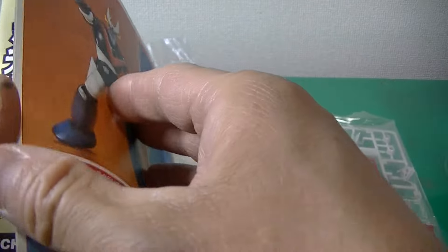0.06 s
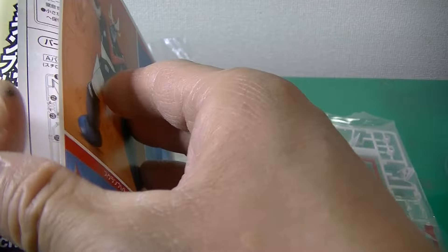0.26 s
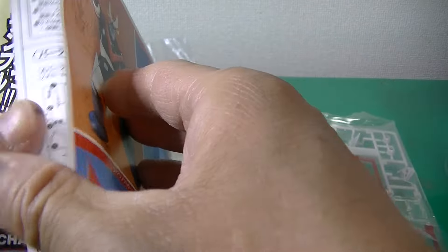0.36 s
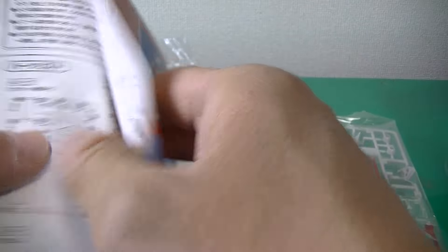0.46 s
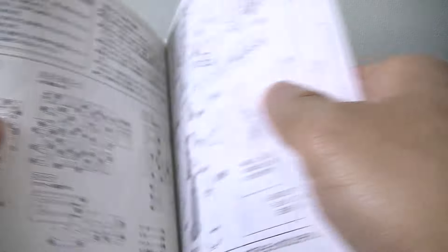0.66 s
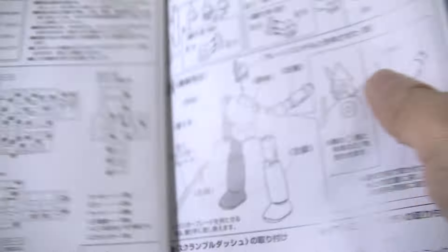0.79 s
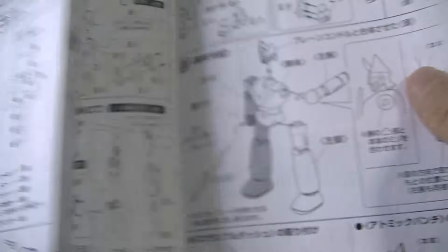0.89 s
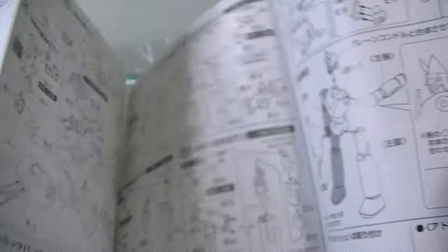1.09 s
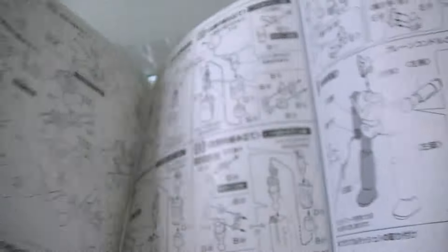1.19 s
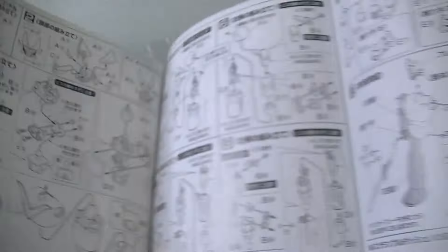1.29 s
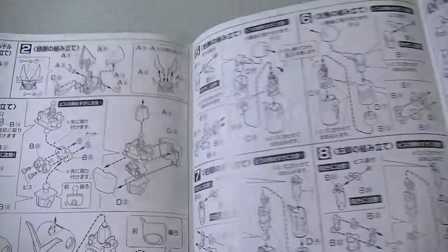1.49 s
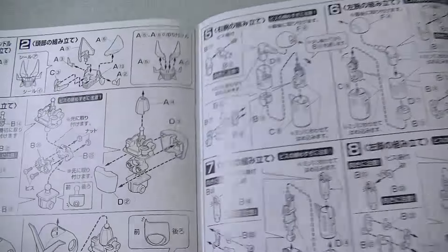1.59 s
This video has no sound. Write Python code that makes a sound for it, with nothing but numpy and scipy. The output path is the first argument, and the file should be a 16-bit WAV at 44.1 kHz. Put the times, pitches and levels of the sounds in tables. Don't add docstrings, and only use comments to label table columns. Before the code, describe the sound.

Close, dry page turning: light edge ticks build to sharp snaps, then crinkling paper settles quietly

```python
import sys
import numpy as np
from scipy import signal
from scipy.io import wavfile

SR = 44100
rng = np.random.default_rng(int(sys.argv[2]) if len(sys.argv) > 2 else 0)


def makeup_ratio(level_db):
    decades = np.asarray(level_db, float) / 20
    return 10 ** decades


def generate_wav(signal):
    frames = np.transpose(np.atleast_2d(signal))
    scaled = np.clip(frames, -1, 1) * 32767
    pcm = np.round(scaled).astype(np.int16)
    wavfile.write(sys.argv[1], SR, pcm)


N = 72765


def rms_one(x):
    return x / np.sqrt(np.mean(x ** 2) + 1e-20)


def in_time(rows):
    time_s, level_db = np.transpose(rows)
    return np.interp(np.arange(N) / SR, time_s, level_db)


def at_hz(points, hz):
    points = np.array(points)
    return np.interp(np.log(hz), np.log(np.maximum(points[:, 0], 1)), points[:, 1])


# pitch_hz, side_over_middle_db
STEREO_WIDTH = [(40, -8), (300, -17), (2000, -18.5), (7000, -6.5), (14000, -3)]


def spread(mid, side, hz):
    return mid + makeup_ratio(at_hz(STEREO_WIDTH, hz)) * side * np.array([[1], [-1]])


def drift(rate_hz):
    r = np.exp(-80 * np.pi * rate_hz / SR)
    white = rng.standard_normal(N // 40 + 2002)
    slow = signal.lfilter([1], [1, -2 * r, r * r], white)[2000:]
    return np.interp(np.arange(N) / 40, np.arange(len(slow)), rms_one(slow))


def banded_noise(spectrum, patchy_db, rate_hz):
    out = 0
    together = drift(rate_hz)
    edges_hz = 22 * 2 ** np.arange(0, 9.6, .5)
    white = rng.standard_normal((2, 2, N))
    for k, (low, high) in enumerate(zip(edges_hz, edges_hz[1:])):
        band = signal.butter(2, [low, high], "band", fs=SR, output="sos")
        mid, side = signal.sosfilt(band, white[k % 2])
        hz = np.sqrt(low * high)
        flicker_db = patchy_db * (together + 2.1 * drift(rate_hz))
        out = out + makeup_ratio(at_hz(spectrum, hz) + flicker_db) * spread(mid, side, hz)
    return rms_one(out)


def ring(clicks, hz, cycles):
    r = makeup_ratio(-60 * hz / (cycles * SR))
    w = 2 * np.pi * hz / SR
    stage = [(1 - r * r) / 2, 0, (r * r - 1) / 2, 1, -2 * r * np.cos(w), r * r]
    return signal.sosfilt([stage] * 3, clicks + 1e-18) / np.sqrt(1 - r * r)


def clump_shapes(start_s, length_s, sag):
    attack_s, attack_share = 0.00078, 0.13
    release_s, tail_db, tail_s, treble_s = 0.0037, -27.5, 0.11, 0.0044
    t = np.arange(N) / SR - start_s
    length_s = np.maximum(length_s, .002)
    after = np.maximum(t - length_s, 0)
    swell = np.clip(t / (attack_s + attack_share * length_s), 0, 1)
    hold = np.exp(-sag * np.clip(t / length_s, 0, 1))
    shape = swell * hold * (np.exp(-after / release_s) + makeup_ratio(tail_db) * np.exp(-after / tail_s))
    if sag > 0:
        return shape, shape * (0.66 + np.exp(-np.maximum(t, 0) / treble_s))
    return shape, shape


def creases(rows, spectrum, sag):
    creases_per_s, crease_spread_db, fuzz = 2500, 3.5, 0.6
    rows = np.array(rows)
    level_db, dullness_db, brightness_db = rows[:, 1], rows[:, 3], rows[:, 4]
    shape, treble_shape = clump_shapes(rows[:, :1], rows[:, 2:3], sag)
    born = rng.random(N) < creases_per_s / SR
    strength_db = crease_spread_db * np.minimum(rng.exponential(1, N), 4)
    clicks = rms_one(born * makeup_ratio(strength_db))
    pitches = np.geomspace(170, 13500, 30)
    weights_db = at_hz(spectrum, pitches) + 10 * np.log10(pitches)
    out = 0
    for hz, weight_db in zip(pitches, weights_db - max(weights_db)):
        dull = np.clip(np.log2(1300 / hz), 0, 1)
        bright = np.clip(np.log2(hz / 2800), 0, 1.5)
        db = level_db + dull * (dullness_db + 17) + bright * (brightness_db + 7)
        db = db + 2.96 * rng.standard_normal(len(rows))
        loudness = makeup_ratio(db) @ (treble_shape if bright > .5 else shape)
        cycles = 9.5 * (hz / 2000) ** 0.27
        hits = (clicks + fuzz) * loudness * rng.standard_normal((2, N))
        delay = int(2 * cycles / np.log(1000) / hz * SR)
        mid, side = np.roll(ring(hits, hz, cycles), -delay, axis=1)
        out = out + makeup_ratio(weight_db) * spread(mid, side, hz)
    return makeup_ratio(-19) * out


# start_s, level_db, length_s, dullness_db, brightness_db
THUMB_SLIPS = [(.006, -22.5, 0.0076, -37, 0.5), (.0255, -18.5, 0.0033, -27, -4),
               (.065, -17, 0.0078, -5.5, -17), (.201, -18.5, 0.015, -51, -9), (.213, -19, 0.0093, -18, 2.5),
               (.286, -31, 0.0075, -15, 8.5), (.314, -22, .007, -43, 1.5), (.325, -31, 0.0059, -38, -4),
               (.352, -27, 0.0048, -40, -3), (.365, -21, 0.014, -31, -2.5), (.407, -22.5, 0.025, -53, 0),
               (.426, -22.5, 0.0093, -4.5, 2), (.438, -16.5, 0.01, -5.5, 1), (.444, -9, 0.017, -45, 0),
               (.467, -2.5, 0.0027, -12, -2), (.473, -15.5, 0.01, -46, 4.5), (.486, -20, 0.0089, -40, 8.5),
               (.496, -14.5, 0.011, -9, 11.5), (.507, -11, 0.0099, -6, -6), (.519, -8.5, 0.0091, -12, -11)]
# pitch_hz, level_db (per Hz)
EDGE_TONE = [(90, -50), (160, -20.5), (1100, -9), (1800, 0.5), (3800, -13.5), (7800, -29), (16000, -50.5)]


def edge_riffle():
    return creases(THUMB_SLIPS, EDGE_TONE, sag=-0.51)


# start_s, level_db, length_s, dullness_db, brightness_db
SHEET_BUCKLES = [(.533, -12, 0.016, -21, -34), (.551, -8.5, 0.014, -15.5, -42),
                 (.638, -18.5, 0.033, -20.5, -31), (.734, -23.5, 0.008, -8, -25),
                 (.782, -24.5, 0.02, 2, 13.5), (.815, -5.5, 0.011, -13, -11),
                 (.852, -0.5, 0.013, -22.5, -7.5), (.863, -5.5, 0.015, -16.5, 0.5),
                 (.878, -10, 0.014, -13.5, 2.5), (.9335, 3.5, 0.0066, -20.5, -3),
                 (.941, -5, 0.013, -26, -12.5), (.958, -7, 0.012, -10.5, -13),
                 (.979, -10, 0.017, -16.5, -5), (1.005, -6.5, 0.0064, -23, -13.5),
                 (1.014, -9, 0.016, -16.5, -15), (1.052, -12, 0.016, -13.5, -13),
                 (1.074, -13.5, 0.0045, -11, 6), (1.08, -9, 0.029, -19.5, -56),
                 (1.124, -19.5, 0.016, -8, -45), (1.132, -18, 0.025, -20.5, -50)]
# start_s, level_db, length_s, dullness_db, brightness_db
PAGE_SETTLES = [
    (1.213, -29.5, 0.028, -4, -32),
    (1.246, -18, 0.032, -17, -25),
    (1.351, -14, 0.02, -19.5, 5.5),
    (1.374, -24, 0.046, -16, -9),
    (1.406, -23.5, 0.025, -36, 5.5),
    (1.432, -18.5, 0.025, -64, 1),
    (1.453, -24.5, 0.055, -12, 6),
    (1.505, -18.5, 0.014, -40, 2),
    (1.615, -27, 0.01, -22, 2),
    (1.624, -26.5, 0.012, -3.5, 1),
]
# pitch_hz, level_db (per Hz)
SHEET_TONE = [(90, -35), (160, -9), (1100, 1), (2100, -1), (3600, -8.5), (6000, -23), (16000, -53)]


def sheet_buckling():
    return creases(list(SHEET_BUCKLES) + list(PAGE_SETTLES), SHEET_TONE, sag=0.65)


# peak_s, peak_db, pitch_hz
EDGE_SNAPS = [(0.0067, -25.1, 2050), (0.0096, -24.1, 1830), (0.0272, -23.1, 1830), (0.0298, -21.6, 2050),
              (0.0639, -28.8, 1830), (0.0682, -21.0, 1620), (0.1611, -29.2, 2050), (0.2133, -23.7, 2050),
              (0.2137, -31.8, 7510), (0.2195, -27.3, 8440), (0.221, -17.6, 1830), (0.2932, -36.8, 2930),
              (0.3207, -17.4, 1830), (0.3245, -26.4, 1830), (0.3282, -20.1, 2310), (0.359, -28.4, 1830),
              (0.3692, -24.4, 1620), (0.3742, -25.9, 1830), (0.3766, -25.1, 2050), (0.3793, -22.8, 1830),
              (0.4111, -26.9, 1620), (0.4292, -17.0, 1830), (0.4388, -17.0, 1830), (0.4459, -10.7, 1830),
              (0.4493, -11.9, 1830), (0.4532, -13.6, 1620), (0.4586, -7.6, 1620), (0.4709, -2.8, 2050),
              (0.4793, -7.3, 2050), (0.4833, -15.0, 3290), (0.4874, -18.7, 3700), (0.498, -16.1, 6670),
              (0.5025, -9.3, 6670), (0.5081, -10.2, 6670), (0.5088, -14.0, 2310), (0.511, -13.8, 5270),
              (0.5156, -16.0, 2310), (0.523, -9.9, 2050), (0.5351, -16.5, 2310), (0.5522, -20.6, 2050),
              (0.5551, -19.8, 1830), (0.5852, -24.8, 2600), (0.6371, -27.0, 2930), (0.6395, -26.2, 1440),
              (0.6496, -25.2, 2930)]
# peak_s, peak_db, pitch_hz
SHEET_SNAPS = [(0.7351, -20.6, 1440), (0.7904, -22.8, 1280), (0.8165, -12.9, 1440), (0.8205, -12.0, 1010),
               (0.8232, -10.9, 2050), (0.8259, -13.9, 1620), (0.8541, -8.2, 2930), (0.8657, -8.4, 3290),
               (0.8688, -15.6, 2310), (0.8878, -16.0, 4170), (0.8902, -19.9, 4170), (0.8929, -19.9, 1620),
               (0.9346, -4.4, 2310), (0.9408, -8.7, 2310), (0.9471, -10.2, 2050), (0.962, -11.3, 1830),
               (0.9834, -14.7, 2050), (0.9859, -15.8, 1830), (1.0066, -17.3, 1010), (1.0148, -15.6, 1830),
               (1.0175, -17.0, 1140), (1.0206, -15.6, 2310), (1.0237, -15.5, 1830), (1.0532, -16.9, 1280),
               (1.0552, -18.6, 9500), (1.0614, -15.0, 1440), (1.0908, -13.7, 1620), (1.1478, -21.1, 1280),
               (1.2163, -28.2, 1280), (1.2544, -21.0, 1440), (1.2678, -23.9, 1620), (1.3518, -24.1, 1010),
               (1.3527, -25.5, 6670), (1.3549, -25.2, 1280), (1.362, -25.2, 2600), (1.3712, -23.7, 1830),
               (1.4572, -26.9, 2600), (1.5042, -16.7, 2050), (1.5093, -25.7, 1830), (1.5137, -29.5, 1620),
               (1.6192, -33.1, 3700), (1.6267, -29.1, 1140), (1.6299, -27.0, 710)]


def snaps():
    out = np.zeros((2, N + SR))
    t = np.arange(600) / SR
    for peak_s, peak_db, hz in list(EDGE_SNAPS) + list(SHEET_SNAPS):
        rise_s = 1.093 / hz * (hz / 2000) ** 0.75
        swell = (t / rise_s * np.exp(1 - t / rise_s)) ** 2
        tone = np.cos(2 * np.pi * (hz * t + rng.random())) * swell
        side = np.gradient(tone) * SR / (2 * np.pi * hz)
        i = max(int((peak_s - rise_s) * SR), 0)
        out[:, i:i + len(t)] += makeup_ratio(peak_db + 1) * spread(tone, side, hz)
    return out[:, :N]


# start_s, peak_db
SHARP_CRACKS = [(.0088, -22.5), (0.1606, -32), (0.2219, -20.5), (.3197, -38), (0.3278, -28), (0.48, -23),
                (0.5088, -7), (.8657, -18.5), (0.8858, -24.5), (0.9333, -11), (0.9867, -26.5),
                (1.0566, -17.5), (1.5038, -22.5)]


def cracks():
    out = np.zeros((2, N + SR))
    t = np.arange(600) / SR
    band = signal.butter(3, [1800, 9500], "band", fs=SR, output="sos")
    for start_s, peak_db in SHARP_CRACKS:
        crack = rng.standard_normal((2, len(t))) * np.exp(-t / 0.00045)
        crack[0, 0] = 4
        mid, side = signal.sosfilt(band, crack)
        i = int(start_s * SR)
        out[:, i:i + len(t)] += makeup_ratio(peak_db) * spread(mid, side, 8200)
    return out[:, :N]


# start_s, level_db
AIR_PUFFS = [
    (0.512, -52),
    (0.565, -50.5),
    (0.672, -60),
    (0.799, -55),
    (.945, -48),
]


def puffs():
    puff_hz, puff_s = 90.6, 0.0085
    start_s, level_db = np.transpose(AIR_PUFFS)[:, :, None]
    t = np.maximum(np.arange(N) / SR - start_s, 0)
    hz = puff_hz * rng.uniform(0.67, 1.1, start_s.shape)
    swell = t / puff_s * np.exp(1 - t / puff_s)
    return (3 * makeup_ratio(level_db) * swell * np.sin(2 * np.pi * hz * t)).sum(axis=0)


# peak_s, peak_db, pitch_hz
EDGE_SQUEAKS = [
    (1.081, -22, 3550),
    (1.241, -33, 4700),
]


def squeaks():
    squeak_s = .008
    peak_s, peak_db, hz = np.transpose(EDGE_SQUEAKS)[:, :, None]
    t = np.arange(N) / SR - peak_s
    swell = np.exp(-(t / squeak_s) ** 2)
    return (makeup_ratio(peak_db) * swell * np.sin(2 * np.pi * hz * t)).sum(axis=0)


# time_s, level_db
RUB_LEVEL = [(0, -47), (.1, -52), (.4, -56.5), (.53, -40.5), (.63, -41), (.7, -42.5), (.795, -35.5),
             (.81, -49), (.9, -33.5), (.93, -45), (1.1, -52.5), (1.16, -40.5), (1.2, -51), (1.245, -37),
             (1.3, -53), (1.47, -42.5), (1.53, -57), (1.65, -49)]
# pitch_hz, level_db (per Hz)
RUB_TONE = [(1200, -3), (2500, 6.5), (5000, -0.5), (9500, -5.5), (13000, -17), (16000, -41)]


def page_rub():
    return makeup_ratio(in_time(RUB_LEVEL) + 1) * banded_noise(RUB_TONE, patchy_db=2.0, rate_hz=22.5)


# time_s, level_db
BEND_LEVEL = [(0, -37.5), (.1, -46), (.4, -44.5), (.5, -44), (.6, -36), (.72, -39), (.8, -30.5),
              (.95, -32.5), (1.1, -32.5), (1.2, -44), (1.45, -41), (1.55, -46), (1.65, -44)]
# pitch_hz, level_db (per Hz)
FLAP_TONE = [(15, -46), (25, -27.5), (155, 3), (439, -1.5), (1330, -1.5), (4000, -21), (5200, -55)]


def page_flap():
    return makeup_ratio(in_time(BEND_LEVEL) - 2.5) * banded_noise(FLAP_TONE, patchy_db=0.5, rate_hz=20)


# pitch_hz, level_db (per Hz)
HUSH_TONE = [(25, -30), (40, -18), (212, 13), (591, -1), (1940, 0), (8360, -9.5), (16000, -70)]


def room_hush():
    return makeup_ratio(-52.5) * banded_noise(HUSH_TONE, patchy_db=1.6, rate_hz=3.0)


def scene():
    paper = edge_riffle() + sheet_buckling() + snaps() + cracks()
    paper = paper + puffs() + squeaks() + page_rub() + page_flap()
    lean_db = 0.59
    return paper * makeup_ratio([[lean_db], [-lean_db]]) + room_hush()


def roll_off(x):
    return signal.sosfilt(signal.butter(12, 16660, fs=SR, output="sos"), x)


def record(dry):
    dry = signal.sosfilt(signal.butter(8, 15800, fs=SR, output="sos"), dry)
    mix = dry / (1 + np.abs(dry / .96) ** 8) ** 0.1
    return roll_off(mix)


dry = scene()
out = record(dry)
generate_wav(out)
```